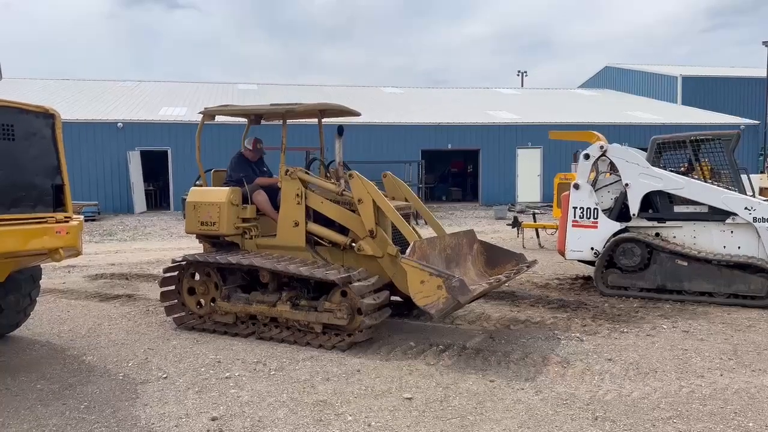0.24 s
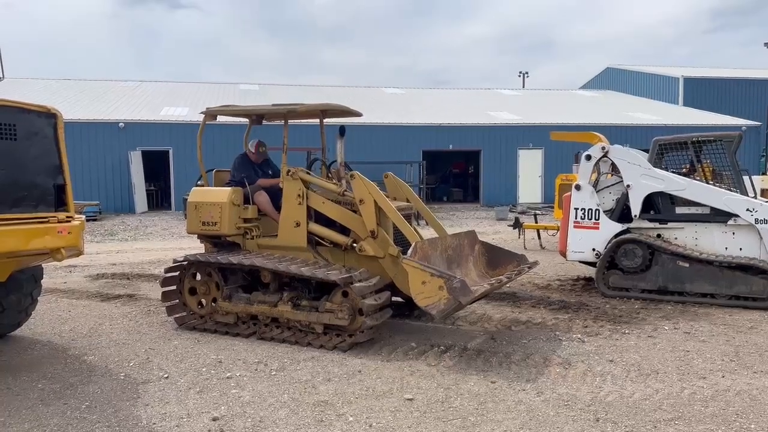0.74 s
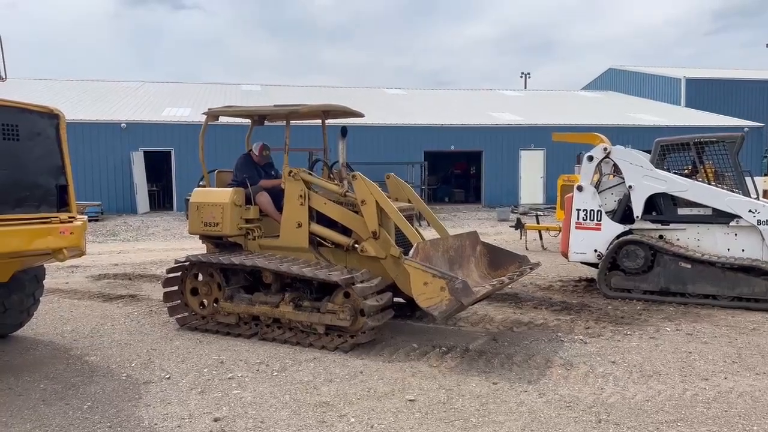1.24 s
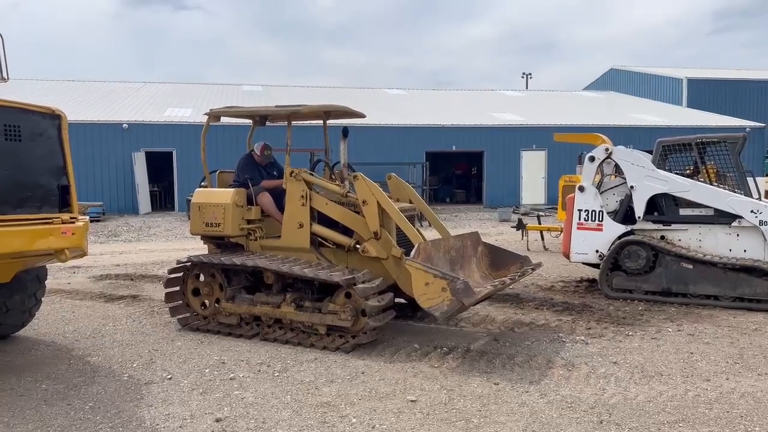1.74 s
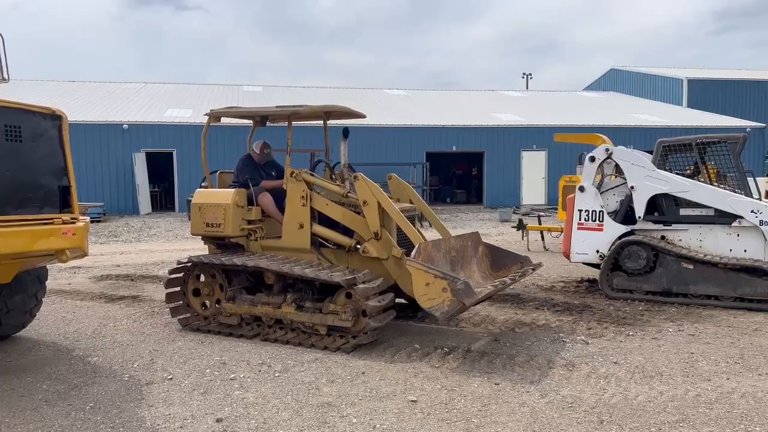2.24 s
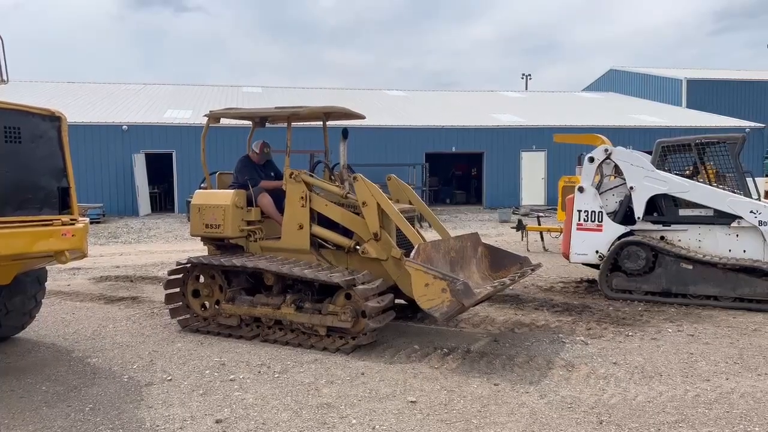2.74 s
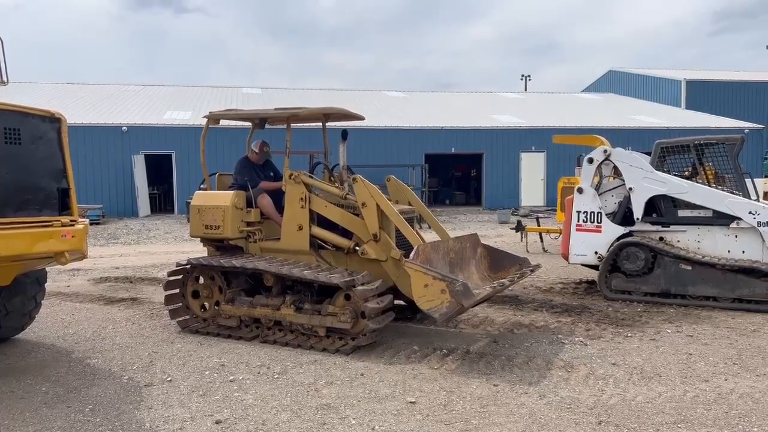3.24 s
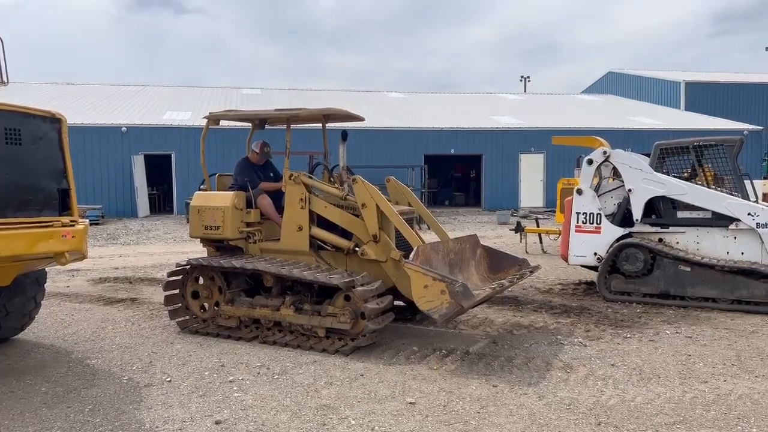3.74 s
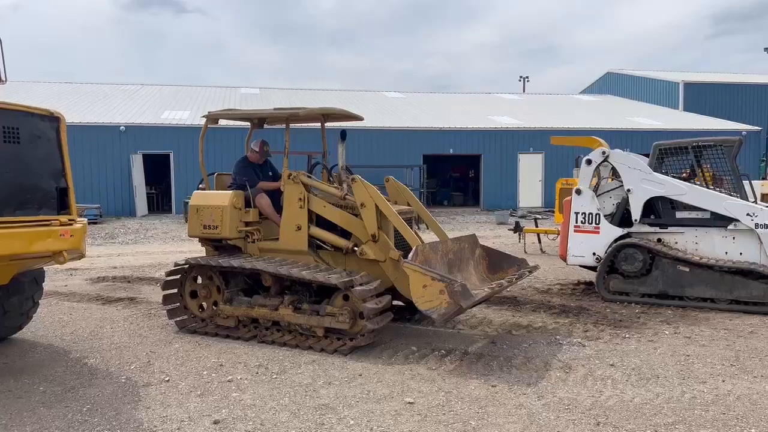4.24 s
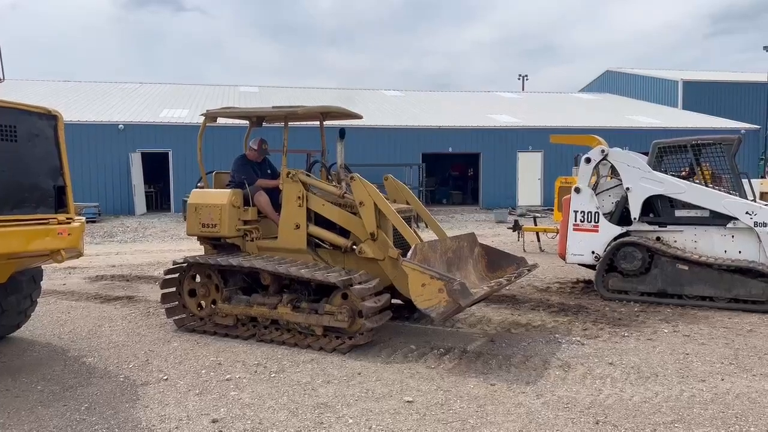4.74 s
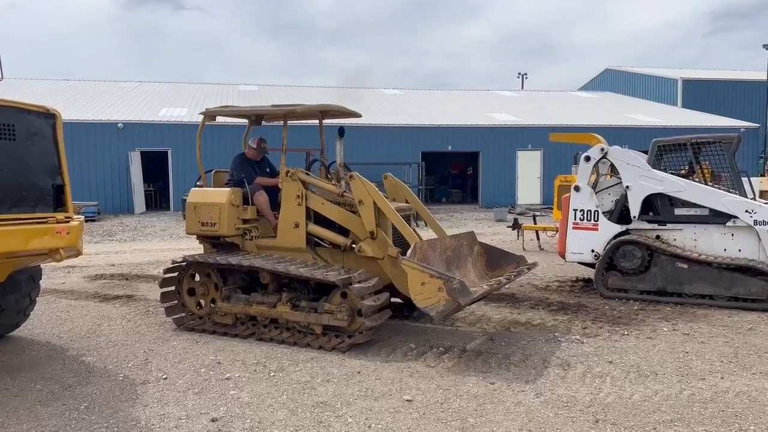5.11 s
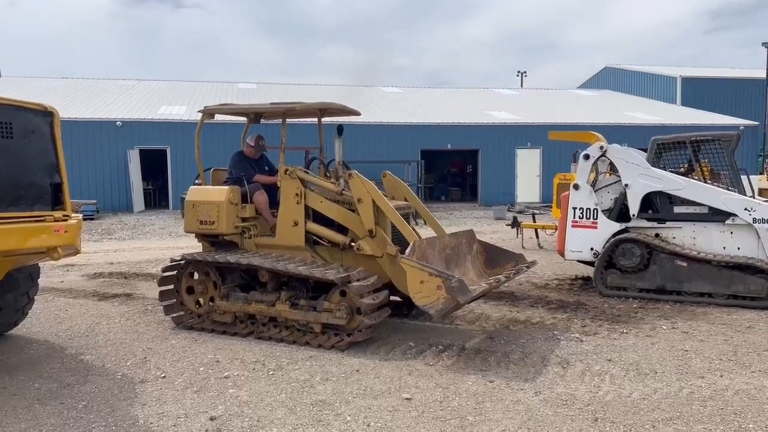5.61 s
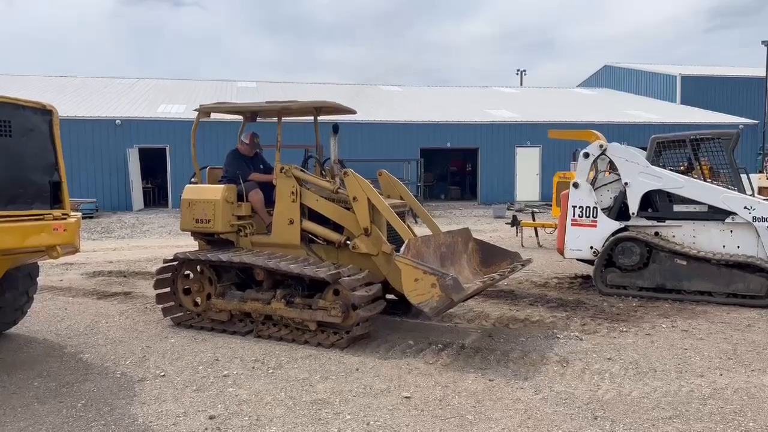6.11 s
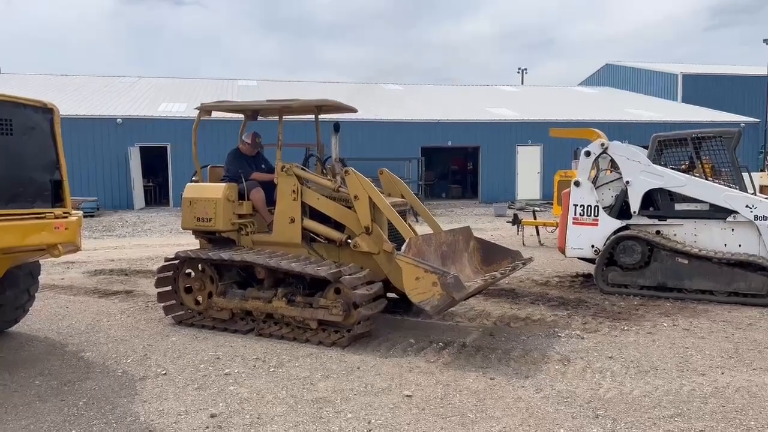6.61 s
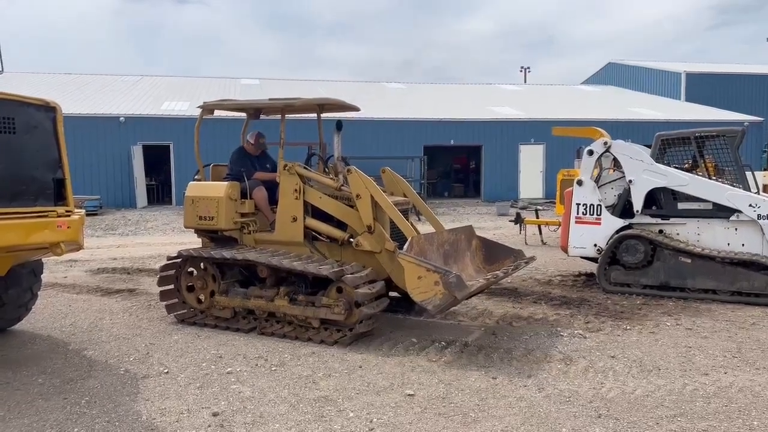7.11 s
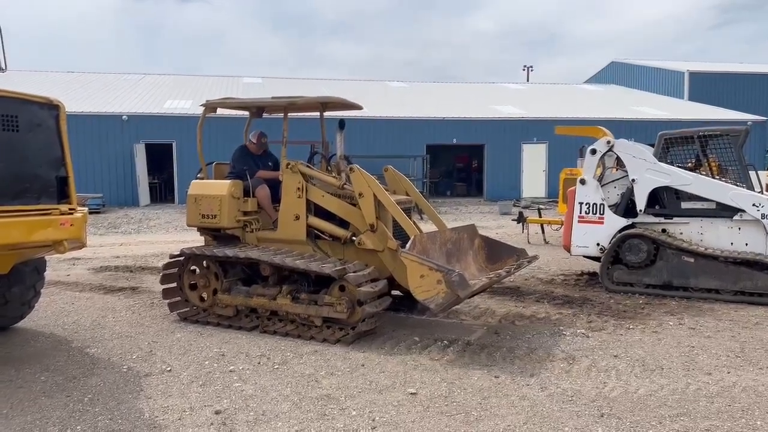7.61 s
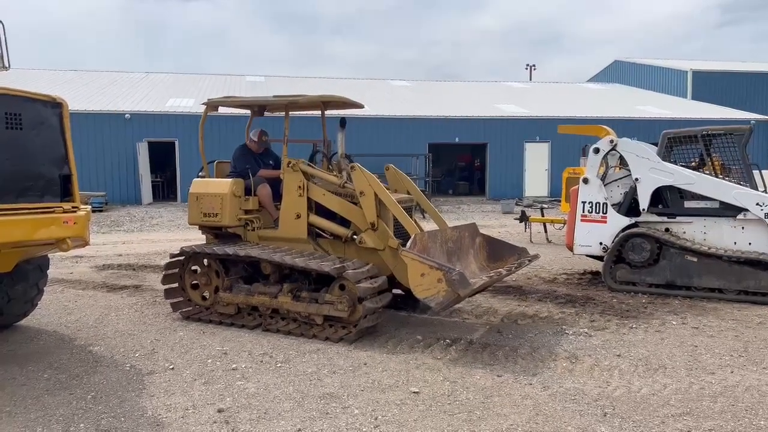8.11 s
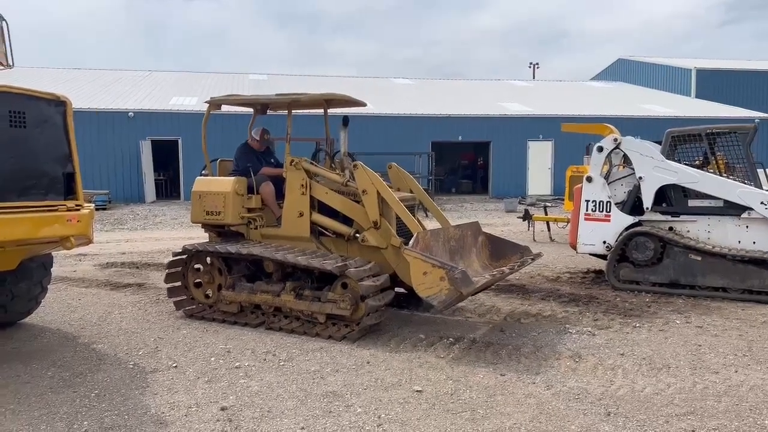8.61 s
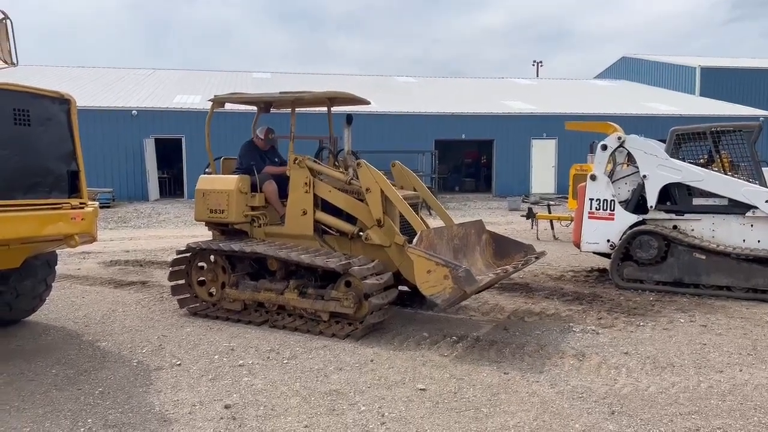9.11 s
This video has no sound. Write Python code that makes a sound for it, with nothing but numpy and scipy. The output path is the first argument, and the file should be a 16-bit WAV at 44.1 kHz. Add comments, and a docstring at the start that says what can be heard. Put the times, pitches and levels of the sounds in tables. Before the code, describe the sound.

A tracked loader's diesel idles steadily outdoors with metallic clatter, then labours into hard knocking under hydraulic load, recovers, and briefly bogs again.

```python
"""A four-cylinder diesel idles: exhaust drone on low cycle orders, over clatter of valves and injectors.
The machine is a tracked loader in an open yard; working its hydraulics drags the speed down.
Drone is sines, clatter and knock are pulses ringing block modes, hiss and rumble are coloured noise.
Gears whine throughout, blurring under load; under load two cylinders that fire in succession knock hard
and a loose cover hums. A pair of close microphone ports hears it."""
import sys
import numpy as np
from scipy import signal
from scipy.fft import rfft, irfft
from scipy.io import wavfile

SR = 44100
rng = np.random.default_rng(int(sys.argv[2]) if len(sys.argv) > 2 else 0)


def convert_level_to_amplitude(level_db):
    """Map a level in decibels to its linear amplitude factor."""
    exponent = np.asarray(level_db, float) / 20
    return 10 ** exponent


def store_pcm(level_fs):
    """Save levels as 16-bit WAV."""
    pcm = np.round(np.clip(level_fs, -1, 1) * 32767).astype(np.int16)
    wavfile.write(sys.argv[1], SR, np.atleast_2d(pcm).T)


N = 412335

# crank speed: time_s, engine_cycles_per_s
SPEED = [(0.0, 12.713), (0.32, 12.857), (3.0, 12.835), (3.6, 12.412), (4.15, 11.949), (4.55, 11.59),
         (4.8, 11.442), (5.0, 11.892), (5.45, 11.981), (5.57, 12.377), (5.76, 10.983), (5.96, 11.07),
         (6.13, 12.839), (6.3, 12.866), (7.85, 12.843), (8.1, 11.506), (8.25, 12.235), (8.48, 13.049),
         (8.8, 12.786), (9.35, 12.929)]
# hydraulic work, idle share included: time_s, total_load (0-1.2)
WORK = [(0, 0.27), (3.1, 0.26), (3.45, 0.42), (3.8, 0.61), (4.1, 0.94), (4.45, 1), (4.9, 1.02), (5.4, 0.89),
        (5.62, 0.86), (5.82, 1.16), (5.96, 0.9), (6.12, 0.67), (6.24, 0.32), (7.92, 0.29), (8.0, 0.6),
        (8.09, 0.94), (8.17, 0.94), (8.24, 0.88), (8.35, 0.4), (8.42, 0.33), (9.35, 0.24)]
IDLE_LOAD = 0.2   # total load less this is the load passed to the sources
# running engine, knocks and cover excepted: time_s, gain_db
ENGINE_GAIN = [(0, -2.5), (3.0, -0.1), (6.5, -1), (9.35, 0.5)]
# exhaust drone before swells and gain: cycle_multiple (used rounded), rms_db at load 0, rms_db at load 1
EXHAUST_ORDERS = [(2, -51, -50), (3, -82, -53.8), (4, -35, -31), (5, -49, -43), (6, -76, -61),
                  (7, -38.5, -36.5), (8, -37, -21), (9, -40.5, -40), (10.04, -52, -35), (11.05, -40, -42),
                  (12, -36.9, -43.7), (13.11, -36, -45), (13.96, -55.5, -73), (15, -43.5, -33),
                  (16, -35, -37.5), (16.93, -44.5, -32.5), (18, -38.5, -51), (19, -44, -33),
                  (20.16, -47.5, -32.5), (21, -66.5, -42), (22.1, -76, -42), (22.7, -71, -36),
                  (24, -68, -38.5), (25.05, -68, -51), (30.52, -52, -62), (32, -43.5, -61)]
# twelfth order, replaces its row above: time_s, rms_db
TWELFTH_ORDER = [(0, -38), (2.6, -37.5), (3.4, -34), (3.8, -26.5), (4.1, -27), (4.27, -29.5), (4.42, -45),
                 (5.35, -50), (5.58, -27.5), (5.72, -32.5), (6.2, -44), (6.45, -32.5), (6.9, -28.5),
                 (7.1, -34.5), (7.8, -33), (8.0, -33), (8.18, -40), (8.3, -26.5), (8.55, -28.5),
                 (8.7, -36.5), (9.1, -31), (9.35, -37)]
# drone beyond its load law: time_s, eighth_order_db, orders_17_to_24_db
DRONE_SWELLS = [(0, -1.5, -6), (3.4, -1.5, -5.5), (3.8, -5, -4), (4.1, -4.5, -2.5), (4.4, -2, -2.5),
                (4.7, -1, -5), (5.0, 0, -3.5), (5.2, 1, 1), (5.45, 0, 2.5), (5.65, -4, -3), (5.85, -1, -2),
                (6.05, 2.5, 2.5), (6.25, 0, -1.5), (7.9, 0, -7.5), (8.1, -5.5, -2), (8.3, -4, 2),
                (8.5, -1, -3), (9.35, 2, -7)]
# puffs leaving the stack: cycle_fraction, relative_size
PUFFS = [(-.078, 1.0), (.311, .63), (.429, .7), (.707, .42)]
# exhaust resonances that delay the orders: centre_hz, width_hz
PIPE = [(91, 5), (165, 53)]
# valve gear and injector blows, relative: cycle_fraction, low_db, lower_middle_db, upper_middle_db, high_db
CONTACTS = [(.0, -30.5, -35, -34.5, -38.5), (.06, -37.5, -39.5, -25, -40), (.11, -40, -36.5, -35, -39),
            (.19, -33, -32.5, -44.5, -51), (.24, -26, -36.5, -39.5, -39), (.30, -35.5, -34.5, -31, -45),
            (.36, -39, -27.5, -38, -41), (.42, -31.5, -34.5, -40, -38), (.54, -36, -38.5, -34, -44.5),
            (.59, -39, -41, -39.5, -46), (.66, -48, -41.5, -41, -41), (.73, -34.5, -38.5, -36, -43.5),
            (.79, -30, -37, -37.5, -39.5), (.84, -25, -37, -31.5, -34.5), (0.9, -31, -37, -45, -41)]
# block and cover modes: pitch_hz, relative_db, t60_s (full; each kind of blow rings a share of it)
BLOCK_MODES = [(617, -13.5, 0.086), (695, -9.5, 0.054), (849, -11, 0.045), (890, -4, 0.049),
               (966, -10.5, 0.051), (1190, -7, 0.047), (1276, -4.5, 0.06), (1427, -1, 0.077),
               (1535, 1, 0.066), (1639, -1, 0.073), (1696, 0.5, 0.064), (1743, -4.5, 0.04),
               (1876, -5, 0.035), (1974, 4.5, 0.033), (2103, 1.5, 0.062), (2314, 3, 0.056),
               (2530, -4, 0.056), (2740, -3.5, 0.07)]
LOW_BELOW_HZ, MIDDLE_SPLIT_HZ, HIGH_ABOVE_HZ = 1150, 1580, 1950
# combustion knock: cycle_fraction, crack_db at total load 1, db_per_unit_load, block_ring_db over crack
CYLINDERS = [(-.01, -10.5, 28, -.5), (.243, -29, 30, 0), (.493, -27, 62, -2), (.738, -16, 40, -1.5)]
# range in which the knock emerges: total_load at start, total_load at end
KNOCK_EMERGES = (.25, .65)
HARDEST_KNOCK_DB = -11   # cap on the load law, before spread
KNOCK_SPREAD_DB, RING_SPREAD_DB = 1.0, 1.5   # from firing to firing
CRACK_COLOUR_SPREAD_DB, MODE_SPREAD_DB = 1.5, 2.0
# knocks under load, strong and weak, relative: time_s, crack_db, then over crack: low_db, middle_db, high_db
LOADED_KNOCKS = [(3.9203, -19.5, -2, 4, -6), (4.0015, -21, 6, 4, 1.5), (4.0843, -19.5, -5, 0, -5),
                 (4.1462, -20.5, -4, 3, -4), (4.1672, -18, -9, 1, -9), (4.2292, -22.5, -16, -3, 2),
                 (4.251, -15, -23, 3.5, -2.5), (4.314, -20, -3, 2, -3), (4.336, -16, -6.5, -5, 2.5),
                 (4.4, -18.5, -6, 5.5, -3), (4.4229, -11.5, -21, -1.5, -12), (4.486, -16, -13, -2, -5),
                 (4.5078, -12, -9, 1, -6), (4.5706, -13.5, -3, -3, -9), (4.5938, -12.5, -3, -1, -2),
                 (4.6577, -18.5, -1.5, 8, -2), (4.6795, -10, -14, 1, -10), (4.7448, -17, -13, 3, 0),
                 (4.7668, -11, -6, 0.5, -0.5), (4.8327, -17, -1, 1, -4), (4.8547, -12.5, -10, 2.5, -11.5),
                 (4.878, -24, 9, 9, 3), (4.9196, -13.5, -8, 2.5, -11), (4.94, -15, -4, 2.5, 4.5),
                 (5.0046, -21, 7, -5, -10), (5.0254, -12, -12, 3, -1.5), (5.087, -18, -21, 8, -10),
                 (5.1105, -12, -20, 2.5, -16), (5.1716, -17, -4, -15, 1), (5.1936, -14.5, -24, 8, -3),
                 (5.257, -17.5, -17, -5, -14), (5.2766, -15, -15, 2.5, 0), (5.338, -17, -3, 5, -1),
                 (5.36, -13.5, -13, -4, -13), (5.4425, -13.5, -8.5, -0.5, -2), (5.5036, -26, -8, 5, 0),
                 (5.5275, -16.5, -8, -1.5, -4), (5.6069, -18.5, -5, -13, -13), (5.6926, -17, -8, 1, -7),
                 (5.7587, -16, -8, 4, -16), (5.7812, -14.5, -17, -5, 3.5), (5.8283, -20.5, -9, 2.5, -27),
                 (5.851, -13, -27, -8, -17), (5.8734, -13.5, -26, 0, 2), (5.9192, -15.5, 0, -16, -16),
                 (5.94, -16.5, -5, -4, -5), (5.963, -10.5, -5.5, 3.5, -2.5), (6.0269, -15.5, -1.5, -7, -12),
                 (6.0496, -15, -9, -4, -1.5), (6.1116, -19, -7, -3, -11), (6.1277, -23, -9, 2.5, -17),
                 (8.0041, -19, -22, 0, -4), (8.0674, -29, -10, 8, -7), (8.0876, -19, -10, 3.5, 0),
                 (8.1507, -16.5, -12, 1, -1), (8.1724, -12, -14, -3.5, -3), (8.2358, -29, -4, 4, 0),
                 (8.2565, -20, -2, 1, -2.5), (8.315, -28.5, -2, -1, -13), (8.335, -20.5, -2, 2, -7)]
# crack bands, each with its own chance strength: edge_hz
CRACK_EDGES = [1800, 3600, 4500, 5600, 7000, 8800, 13000]
# crack pressure spectrum: pitch_hz, relative_db_per_hz
CRACK_SPECTRUM = [(2000, -10), (3200, 2.5), (4000, -0.5), (4800, 4.5), (5600, 5.5), (7000, 4.5), (9500, -3),
                  (11000, -14), (12200, -34)]
# play of the parts after each blow: delay_s, relative_db
REBOUNDS = [(0, -1), (.0035, -4), (.0085, -10)]
# timing gears, before drift and gain: cycle_multiple, peak_db
GEAR_ORDERS = [(49, -51), (54, -43), (56, -45), (63, -50), (111, -43), (117, -47), (119, -44), (122, -48),
               (128, -43), (132, -39), (136, -46), (138, -47), (146, -43), (150, -52), (163, -50),
               (203, -58)]
# loose cover under load: time_s, pitch_hz, rms_db
COVER_HUM = [(4.0, 628.4, -41), (4.05, 632.6, -45), (4.55, 631.9, -32), (4.7, 617.8, -53),
             (5.13, 636.2, -34), (5.2, 619.1, -38), (5.6, 633.8, -39), (5.77, 631.5, -29),
             (5.8, 630.6, -53), (6.1, 634.9, -43)]
# fan hiss spectrum: pitch_hz, relative_db_per_hz
HISS_SPECTRUM = [(300, -41), (500, -15.5), (840, -4), (1130, -15), (1700, -12.5), (2600, -18.5),
                 (3050, -29.5), (4800, -22), (5900, -27.5), (6600, -22), (8200, -27.5), (9500, -34.5),
                 (11000, -59), (12500, -86)]
# turbulent exhaust spectrum: pitch_hz, relative_db_per_hz
RUMBLE_SPECTRUM = [(20, -26), (60, 0.5), (150, 8), (250, 2.5), (350, -0.5), (480, -8), (700, -110)]
# echoes off ground, machines and shed: delay_s, level_db
WALLS = [(0.012, -11), (0.023, -11), (0.046, -9), (0.082, -8.5)]
# mid against side of the port pair: pitch_hz, likeness (1 = all mid)
PORT_LIKENESS = [(30, 0.6), (60, 1), (300, 1), (600, 0.96), (1200, 1), (2400, 0.77), (4000, 0.47),
                 (8000, 0.48), (12000, 0.34)]
# port balance: pitch_hz, left_over_right_db
PORT_BALANCE = [(60, 0.0), (110, 0.0), (190, 0.0), (350, -0.5), (620, -1.0), (1120, -0.5), (2010, -1.5),
                (3620, 0.5), (6490, 2.5), (11700, 3.0)]
LEFT_LEADS_S = 7.5e-5   # path between the ports


def in_time(rows):
    """Columns of a curve table, one value a sample."""
    time_s, *columns = np.transpose(rows)
    return [np.interp(np.arange(N) / SR, time_s, column) for column in columns]


def at_hz(points, hz):
    """A spectrum table read on a log-frequency axis."""
    points = np.array(points, float)
    return np.interp(np.log(hz + 1), np.log(points[:, 0] + 1), points[:, 1])


def rms_one(x):
    """Scale to unit rms."""
    return x / np.sqrt(np.mean(x ** 2) + 1e-20)


def drift(rate_hz):
    """Slow chance of spread 1: two-pole smoothed noise, drawn every 40 samples."""
    r = np.exp(-80 * np.pi * rate_hz / SR)
    slow = signal.lfilter([1], [1, -2 * r, r * r], rng.standard_normal(N // 40 + 2002))
    slow = slow[2000:]   # settled part
    return np.interp(np.arange(N) / 40, np.arange(len(slow)), rms_one(slow))


def noise(spectrum):
    """Two unrelated noises of one colour, joint rms 1."""
    hz = np.fft.rfftfreq(N, 1 / SR)
    white = rng.standard_normal((2, N))
    return rms_one(irfft(rfft(white) * convert_level_to_amplitude(at_hz(spectrum, hz)), N))


def ring(force, hz, t60_s):
    """One decaying mode; a unit click rings with height about 1."""
    r, w = convert_level_to_amplitude(-60 / (t60_s * SR)), 2 * np.pi * hz / SR
    return signal.lfilter([0, np.sin(w)], [1, -2 * r * np.cos(w), r * r], force + 1e-18)


def ring_softly(force, hz, t60_s, contact_s):
    """A drawn-out contact lets the mode build up instead of starting with a tick."""
    rung = ring(ring(force, hz, t60_s), hz, contact_s)
    return rung * 2 * (1 - convert_level_to_amplitude(-60 / (contact_s * SR)))


def steel(x):
    """Stiff castings radiate little bass."""
    return signal.sosfilt(signal.butter(4, 560, "high", fs=SR, output="sos"), x)


def exhaust(cycles, speed, load, twelfth_db):
    """Orders as sines, timed by the uneven puffs and delayed by the pipe; load makes them waver."""
    out = np.zeros(N)
    eighth_db, upper_db = in_time(DRONE_SWELLS)
    for multiple, idle_db, loaded_db in EXHAUST_ORDERS:
        order = round(multiple)
        level_db = twelfth_db if order == 12 else idle_db + load * (loaded_db - idle_db)
        level_db = level_db + eighth_db * (order == 8) + upper_db * (17 <= order <= 24)
        puff_sum = sum(size * np.exp(-2j * np.pi * order * at) for at, size in PUFFS)
        pipe_lag = sum(np.arctan(2 * (order * speed - hz) / width) for hz, width in PIPE)
        phase = np.angle(puff_sum) - pipe_lag
        unrest = order * (.005 + .014 * load)
        wave = -np.sin(2 * np.pi * order * cycles + phase + unrest * drift(4.2))
        out += np.sqrt(2) * convert_level_to_amplitude(level_db + 5.4 * unrest * drift(4.4)) * wave
    return out


def clatter(cycles, load, jitter_s=.000045, spread_db=2.5, travel_s=.0015):
    """The same contacts come round each cycle and ring the block; each view hears other strengths."""
    contacts = np.array(CONTACTS)
    turns = np.arange(int(cycles[-1]))[:, None] + contacts[:, 0]
    at = np.interp(turns, cycles, np.arange(N)) + jitter_s * SR * rng.standard_normal(turns.shape)
    at = np.clip(at, 0, N - 1).astype(int)
    out = np.zeros((2, N))
    for hz, mode_db, t60_s in BLOCK_MODES:
        column = 1 + (hz > LOW_BELOW_HZ) + (hz > MIDDLE_SPLIT_HZ) + (hz > HIGH_ABOVE_HZ)
        force = np.zeros((2, N))
        for view in force:
            # each path through the steel has its own delay and sense, alike in every cycle
            late = (travel_s * SR * rng.random(len(contacts))).astype(int)
            sense = rng.choice([-1, 1], len(contacts))
            blow_db = contacts[:, column] + mode_db + spread_db * rng.standard_normal(at.shape)
            view[np.minimum(at + late, N - 1)] = sense * convert_level_to_amplitude(blow_db)
        out += ring_softly(force, hz, .7 * t60_s, contact_s=0.0025)   # light contacts ring shorter
    return steel(out) * convert_level_to_amplitude(-2.0 + 2.0 * load)


def knock_firings(cycles, load):
    """Sample, crack dB and low, middle, high ring dB of each firing; stronger with load, up to a cap."""
    fraction, full_db, db_per_load, ring_db = np.transpose(CYLINDERS)
    turns = np.arange(1, int(cycles[-1]) - 1)[:, None] + fraction
    at = np.interp(turns, cycles, np.arange(N)).astype(int)
    total_load = load[at] + IDLE_LOAD
    crack_db = np.minimum(full_db + db_per_load * (total_load - 1), HARDEST_KNOCK_DB)
    crack_db = crack_db + KNOCK_SPREAD_DB * rng.standard_normal(at.shape)
    crack_db = crack_db + 20 * np.log10(np.interp(total_load, KNOCK_EMERGES, [.2, 1]))
    blow_db = crack_db + ring_db + RING_SPREAD_DB * rng.standard_normal(at.shape)
    blow_db = blow_db.ravel()[:, None] + [-7.0, 0.0, -4.0]
    at, crack_db, loaded = at.ravel(), crack_db.ravel(), np.array(LOADED_KNOCKS)
    # tabled knocks replace the nearest firings
    which = np.abs(at[:, None] - loaded[:, 0] * SR).argmin(axis=0)
    at[which] = loaded[:, 0] * SR
    crack_db[which] = loaded[:, 1]
    blow_db[which] = loaded[:, 1:2] + loaded[:, 2:]
    return at, crack_db, blow_db


def knock_cracks(at, crack_db, rise_s=0.0011, fall_s=0.0042, tail_s=0.018, tail_db=-14):
    """Bright bursts of pressure noise, each favouring other bands."""
    t = np.arange(SR // 8) / SR
    decay = np.exp(-t / fall_s) + convert_level_to_amplitude(tail_db) * np.exp(-t / tail_s)
    shape = (1 - np.exp(-t / rise_s)) ** 2 * decay
    pressure, out = noise(CRACK_SPECTRUM), np.zeros((2, N))
    for low_hz, high_hz in zip(CRACK_EDGES, CRACK_EDGES[1:]):
        pulses = np.zeros(N)
        pulses[at] = convert_level_to_amplitude(crack_db + CRACK_COLOUR_SPREAD_DB * rng.standard_normal(len(at)))
        band_filter = signal.butter(2, [low_hz, high_hz], "band", fs=SR, output="sos")
        out += signal.sosfilt(band_filter, pressure) * signal.oaconvolve(pulses, shape)[:N]
    return out


def knock_rings(at, blow_db, lag_s=0.001503, scatter_s=0.0007):
    """The blow runs through the steel, rattles on in rebounds and rings the block."""
    out = np.zeros((2, N))
    for hz, mode_db, t60_s in BLOCK_MODES:
        column = int(hz > LOW_BELOW_HZ) + int(hz > HIGH_ABOVE_HZ)
        mode_blow_db = blow_db[:, column] + [0.0, -9.0, -8.0][column] + mode_db
        force = np.zeros((2, N))
        for delay_s, rebound_db in REBOUNDS:
            late_s = lag_s + delay_s + scatter_s * rng.random((2, len(at)))
            late = (late_s * SR).astype(int)
            spread_db = MODE_SPREAD_DB * rng.standard_normal(late.shape)
            force[[[0], [1]], at + late] = convert_level_to_amplitude(mode_blow_db + rebound_db + spread_db)
        out += ring_softly(force, hz, 0.47 * t60_s, contact_s=0.0045)
    return out


def knocks(cycles, load):
    """Combustion knock: a crack of pressure noise plus the ringing block."""
    at, crack_db, blow_db = knock_firings(cycles, load)
    return convert_level_to_amplitude(7.5) * knock_cracks(at, crack_db) + steel(convert_level_to_amplitude(4.0) * knock_rings(at, blow_db))


def gears(cycles, load):
    """Tooth-mesh whine; the uneven turning under load smears it."""
    out = np.zeros(N)
    for order, level_db in GEAR_ORDERS:
        slip_rad = (.35 + 2.6 * load) * drift(4.0)
        wave = np.sin(2 * np.pi * round(order) * cycles + slip_rad)
        out += convert_level_to_amplitude(level_db + 0.83 * drift(3.1)) * wave
    return out


def cover():
    """Loose sheet as one thin, slightly wavering sine."""
    fade_in, fade_out = (3.7, COVER_HUM[0][1], -85), (6.7, COVER_HUM[-1][1], -82)
    hz, level_db = in_time([fade_in] + list(COVER_HUM) + [fade_out])
    phase = 2 * np.pi * np.cumsum(hz) / SR + 0.28 * drift(3.6)
    return np.sqrt(2) * convert_level_to_amplitude(level_db + drift(6.1)) * np.sin(phase)


def air(cycles, load):
    """Fan hiss and exhaust turbulence, both breathing with the cycle and growing with load."""
    once_db = 0.87 * np.cos(2 * np.pi * (cycles - .95))
    four_times_db = 0.93 * np.cos(8 * np.pi * (cycles - .09))
    hiss_db = -34.0 + 9.13 * load + once_db + four_times_db + 1.73 * drift(20.0)
    rumble_db = -35.5 + 6.7 * load + 1.4 * np.cos(8 * np.pi * cycles)
    return noise(HISS_SPECTRUM) * convert_level_to_amplitude(hiss_db) + noise(RUMBLE_SPECTRUM) * convert_level_to_amplitude(rumble_db)


def yard(x):
    """A few dull echoes; each reaches the two views swapped."""
    dull = signal.lfilter([.45], [1, -.55], x)
    out = x.copy()
    for delay_s, echo_db in WALLS:
        lag = int(delay_s * SR)
        out[:, lag:] += convert_level_to_amplitude(echo_db) * dull[::-1, :-lag]
    return out


def ports(views):
    """Two views become mid and side, shared out by likeness; the ports differ in level and arrival."""
    hz = np.fft.rfftfreq(N, 1 / SR)
    alike = np.clip(at_hz(PORT_LIKENESS, hz), -1, 1)
    mid, side = rfft(views) * np.sqrt([1 + alike, 1 - alike]) / np.sqrt(2)
    tilt = convert_level_to_amplitude(at_hz(PORT_BALANCE, hz) / 2) * np.exp(1j * np.pi * hz * LEFT_LEADS_S)
    return irfft([(mid + side) * tilt, (mid - side) / tilt], N)


def scene():
    """Block sounds echo in the yard; drone, whine and hum join the first view only."""
    speed, = in_time(SPEED)
    total_load, = in_time(WORK)
    gain_db, = in_time(ENGINE_GAIN)
    twelfth_db, = in_time(TWELFTH_ORDER)
    load = np.clip(total_load - IDLE_LOAD, 0, None)
    cycles = np.cumsum(speed) / SR
    gain = convert_level_to_amplitude(gain_db)
    drone = exhaust(cycles, speed, load, twelfth_db - gain_db)   # gain cancels for the twelfth order
    views = yard(knocks(cycles, load) + gain * clatter(cycles, load)) + gain * air(cycles, load)
    views[0] += gain * (drone + gears(cycles, load)) + cover()
    return ports(views)


def low_pass(x):
    """Removes everything above the highest recorded frequency."""
    return signal.sosfilt(signal.butter(12, 12260, fs=SR, output="sos"), x)


def record(dry):
    """Peaks are rounded off by a soft limit."""
    rounded = 1.25 * np.tanh(dry / 1.35)
    return low_pass(rounded)


dry = scene()
out = record(dry)
store_pcm(out)
```